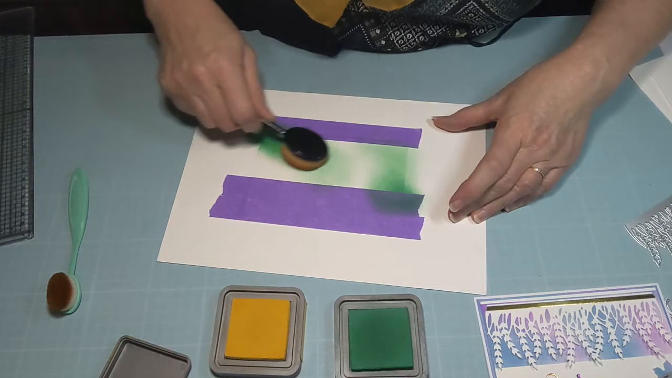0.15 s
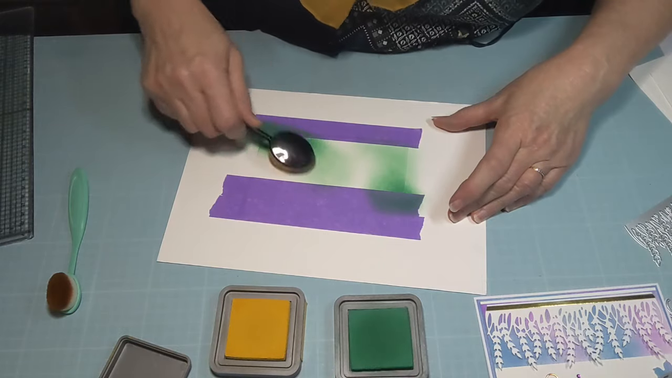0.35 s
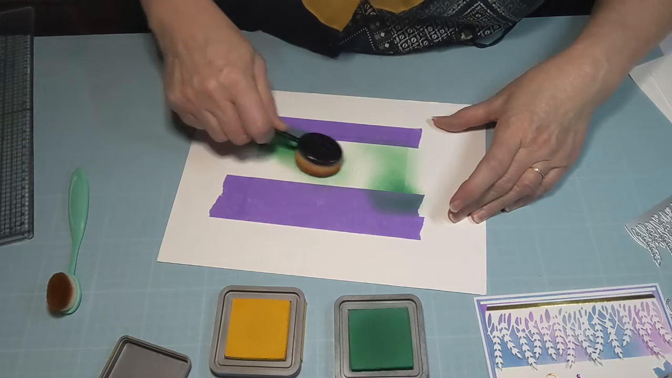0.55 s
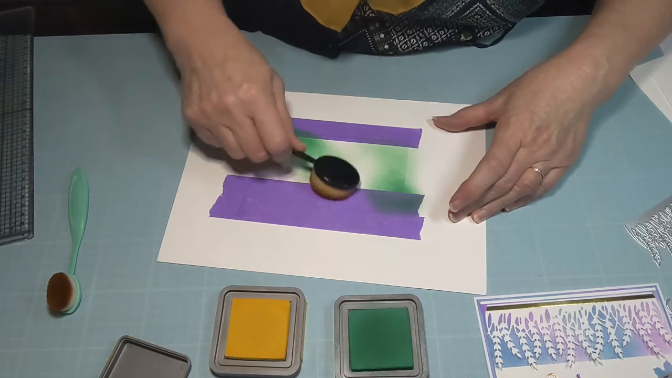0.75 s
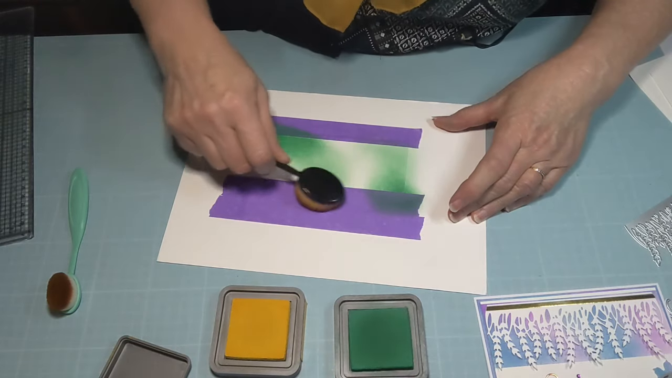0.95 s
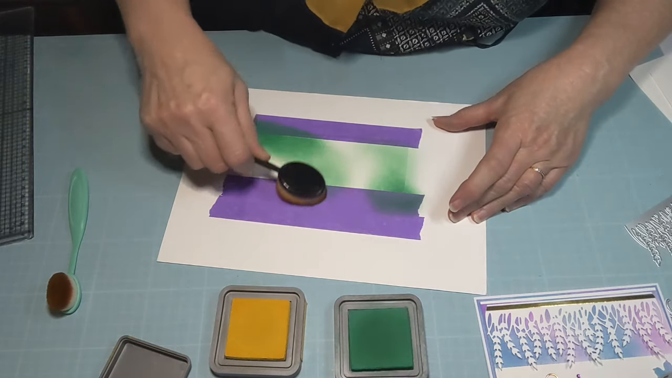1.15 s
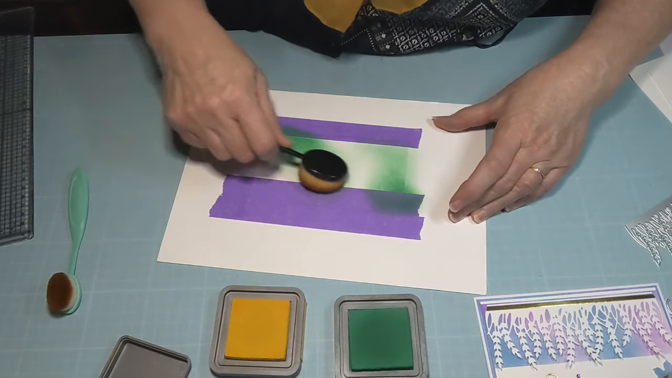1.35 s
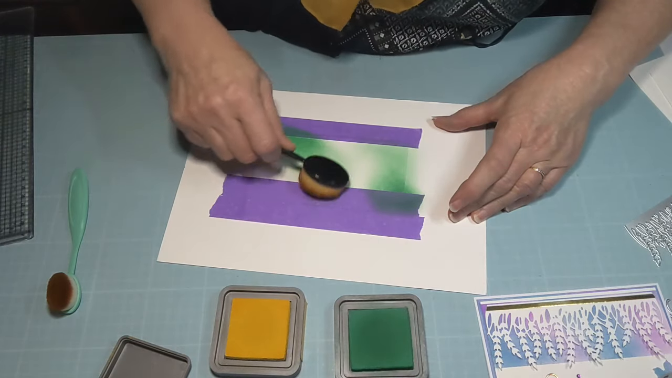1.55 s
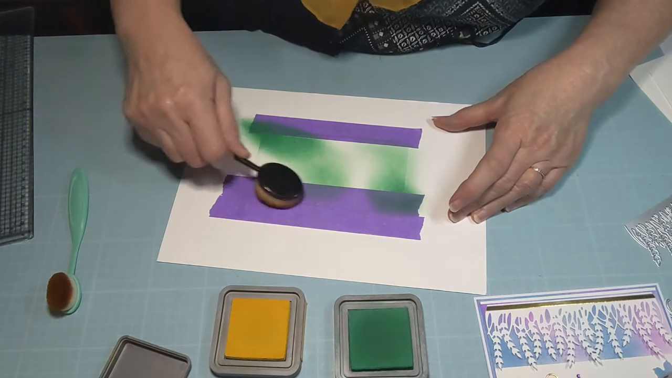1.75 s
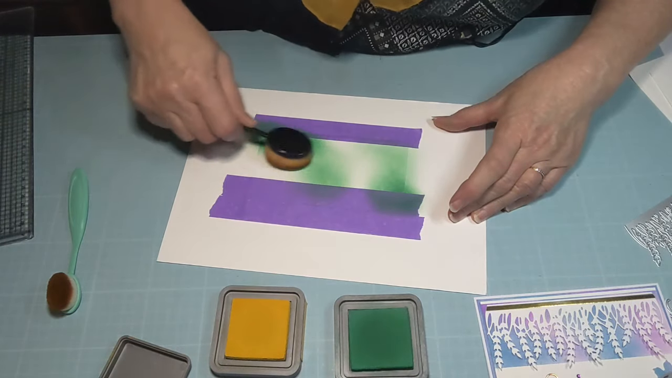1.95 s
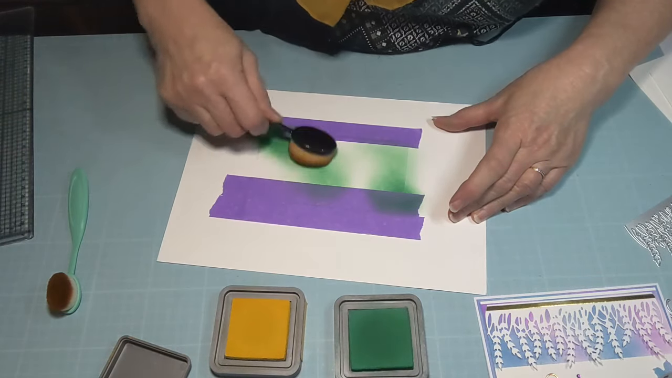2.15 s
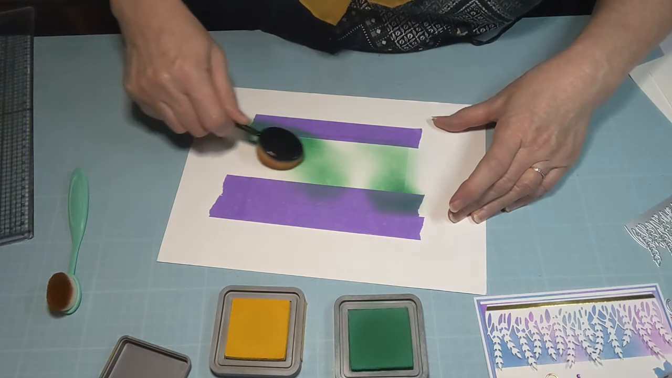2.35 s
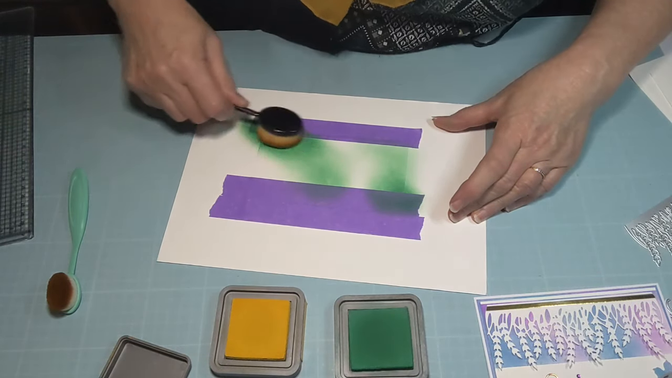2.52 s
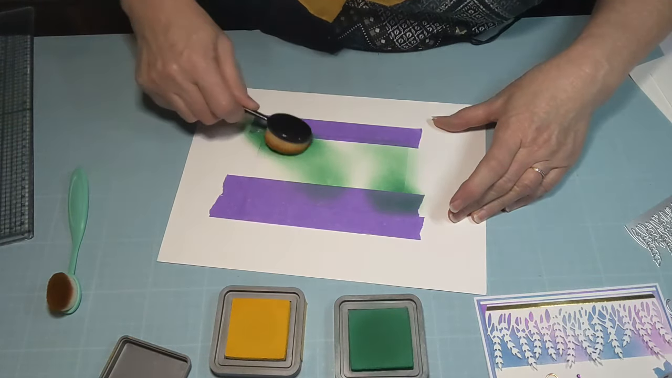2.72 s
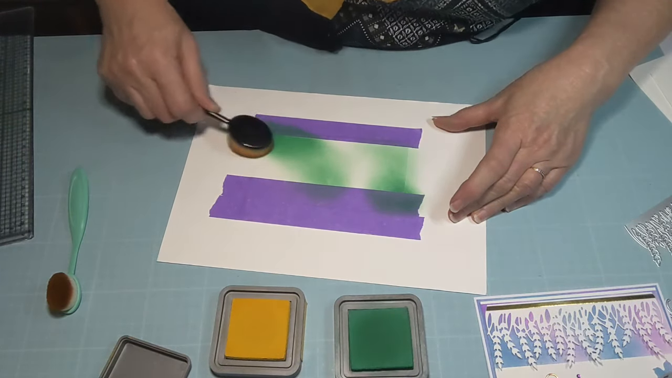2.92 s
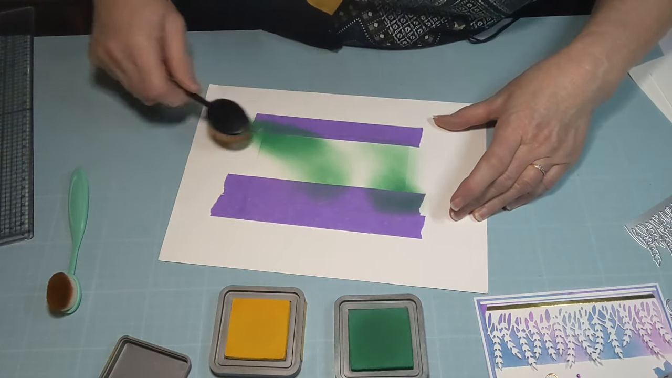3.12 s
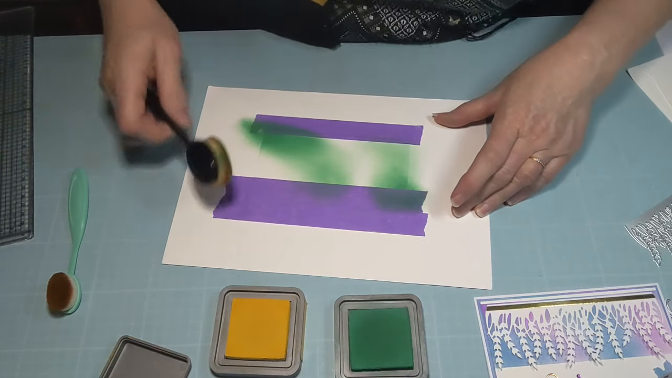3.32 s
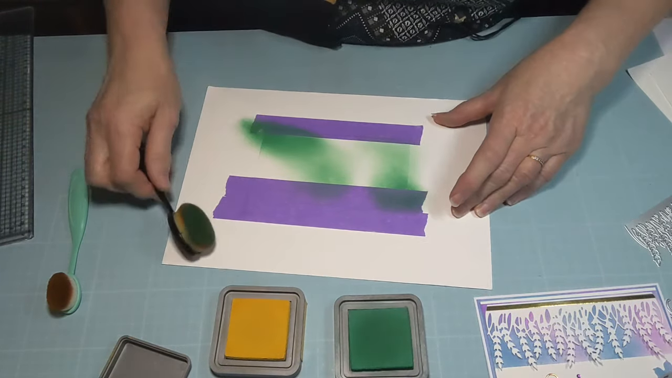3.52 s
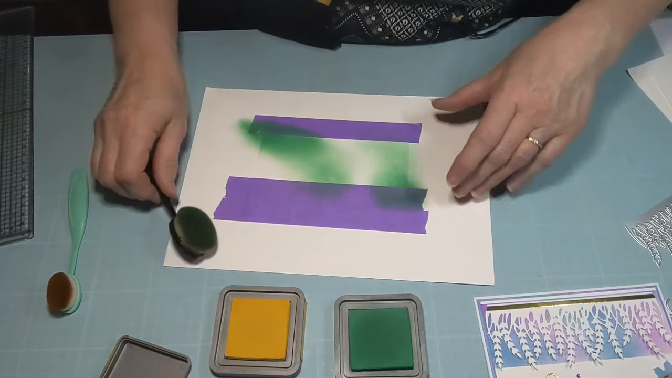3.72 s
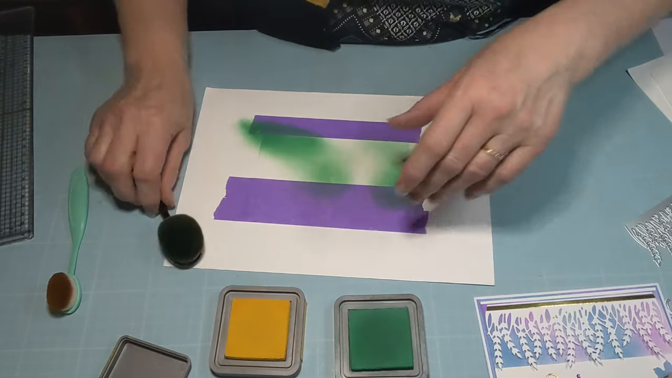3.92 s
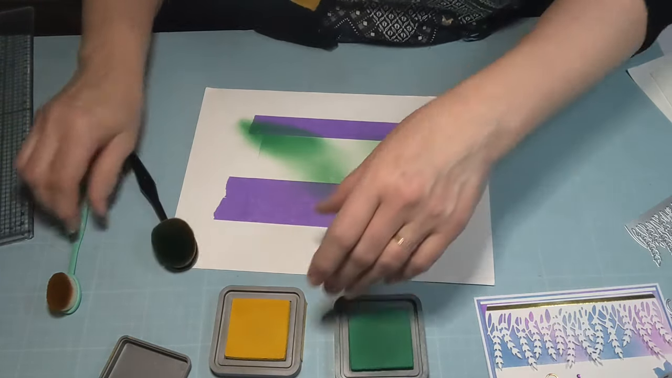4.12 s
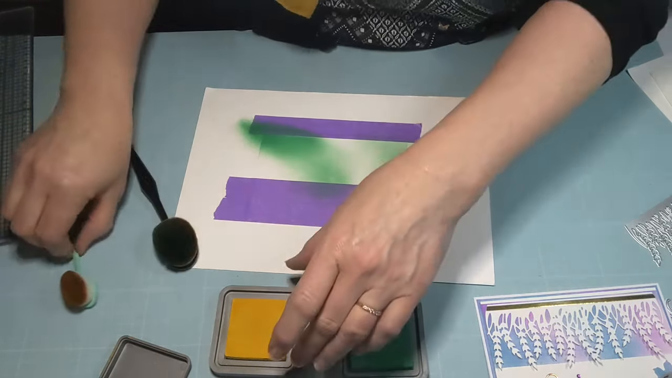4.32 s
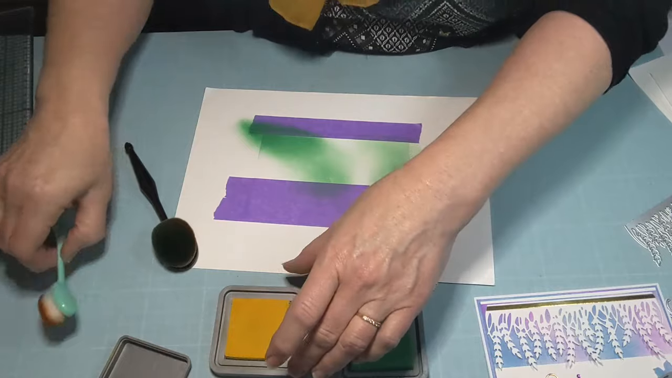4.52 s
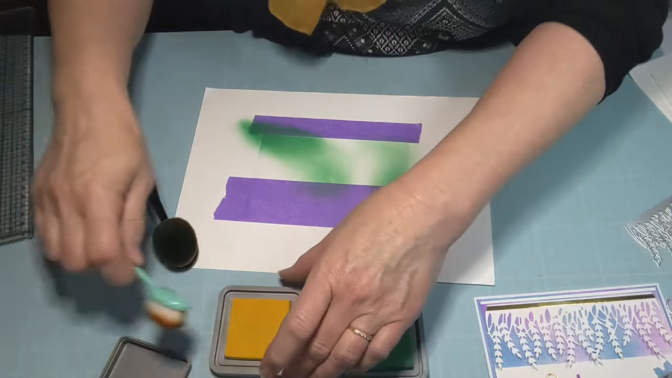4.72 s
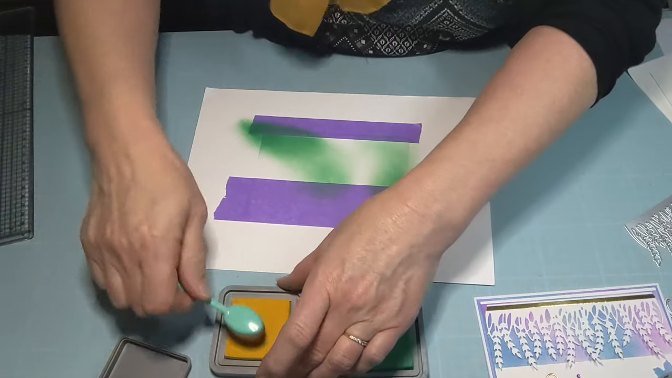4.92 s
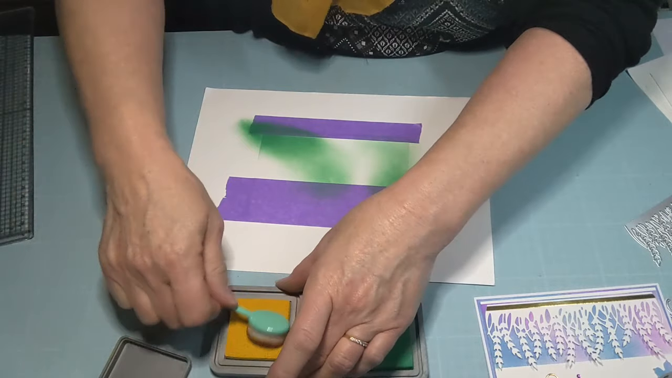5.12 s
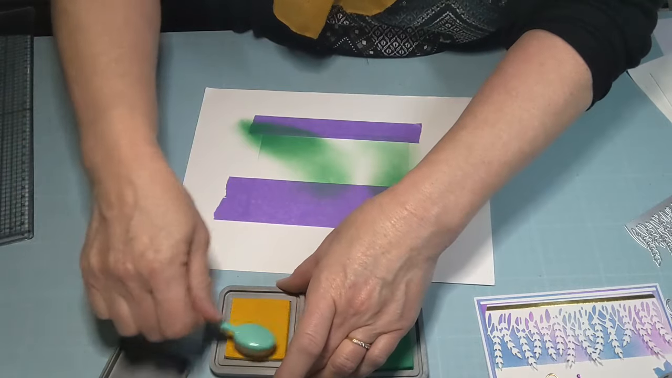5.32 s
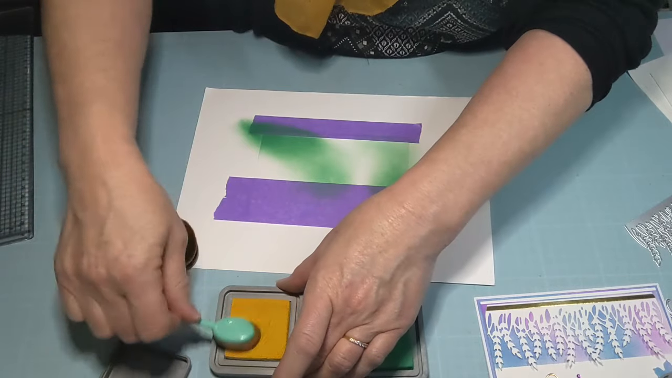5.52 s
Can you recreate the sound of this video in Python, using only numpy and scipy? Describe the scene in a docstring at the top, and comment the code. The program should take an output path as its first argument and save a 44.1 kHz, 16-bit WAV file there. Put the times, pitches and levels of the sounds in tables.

```python
"""A soft blending brush rubs ink into paper in small circles: stick-slip friction of its bristles.
Laid down with a knock and a rattle, it excites the modes of the table top and of its plastic handle.
Hands slide, sleeves rustle, and a second brush is dragged off the mat and swirled on an ink pad.
A small room hums quietly and returns the impacts as early reflections and a short diffuse tail."""
import sys
import numpy as np
from scipy import signal
from scipy.fft import rfft, irfft, next_fast_len
from scipy.io import wavfile
from scipy.ndimage import uniform_filter1d, map_coordinates

SR = 44100
rng = np.random.default_rng(int(sys.argv[2]) if len(sys.argv) > 2 else 0)


def put_to_file(sound):
    """Save the sound as 16-bit audio at rate SR, in the file named by the first command-line argument."""
    columns = np.atleast_2d(sound).T  # one column per channel
    safe = np.clip(columns, -1, 1)
    whole_steps = np.round(safe * 32767)
    wavfile.write(sys.argv[1], SR, whole_steps.astype(np.int16))


N = 245676


def amp(db):
    """Amplitude ratio of a level in decibels."""
    return 10 ** (np.asarray(db) / 20)

def unit(x):
    """Normalisation to rms 1."""
    return x / np.sqrt(np.mean(x ** 2) + 1e-20)

def along(points, hz):
    """Interpolation of (frequency, value) points on a logarithmic frequency axis."""
    f, values = np.transpose(points)
    return np.interp(np.log(hz + 1), np.log(f + 1), values)

def wobble(rate):
    """Slow random modulation: a spline through `rate` Gaussian values a second."""
    knots = rng.standard_normal(int(N * rate / SR) + 4)
    return map_coordinates(knots, [np.arange(N) * rate / SR])

def filtered(x, response):
    """Linear filtering: the spectrum times a frequency response."""
    n = x.shape[-1]
    size = next_fast_len(n + SR // 4)
    return irfft(rfft(x, size) * response(np.fft.rfftfreq(size, 1 / SR)), size)[..., :n]

def spread(pair, spectrum, correlation):
    """Partial coherence: two independent signals, as mid and side, form coloured stereo of rms 1."""
    def response(hz):
        angle = np.arccos(np.clip(along(correlation, hz), -1, 1)) / 2
        return amp(along(spectrum, hz)) * [np.cos(angle), np.sin(angle)]
    mid, side = filtered(pair, response)
    return unit(np.array([mid + side, mid - side]))

def add(track, s, sound):
    """Superposition of a sound on the track from time s."""
    part = track[..., round(s * SR):][..., :sound.shape[-1]]
    part += sound[..., :part.shape[-1]]

def patchy(pair, depth_db):
    """Spectral modulation by a wandering contact: brief gain patches some hundred Hz wide."""
    spectra = signal.stft(pair, nperseg=512)[2]
    field = uniform_filter1d(rng.standard_normal(spectra.shape[1:]), size=3, axis=0)
    field = uniform_filter1d(field, size=12, axis=1)
    return signal.istft(spectra * amp(depth_db * unit(field)), nperseg=512)[1][:, :N]

def swishes(rows, edge_db=9.5, flatness=2.17):
    """Symmetric envelopes of sliding strokes: each gathers speed, peaks and slows."""
    t = np.arange(N) / SR
    return sum(amp(db - edge_db * np.abs(2 * (t - s) / length) ** flatness) for s, length, db in rows)

# Coherence of friction noise: f/Hz, left-right correlation
RUB_COHERENCE = [(300, 1), (900, 0.086), (2500, 0.28), (4000, -0.18), (8000, -0.022), (11000, -0.29),
                 (15000, 0.071)]
def friction(spectrum, slips_per_s, unevenness, flutter_db):
    """Stick-slip friction: tiny impulses of log-normal size, coloured by the surface; the grip wavers."""
    slips = rng.random(N) < slips_per_s / SR
    sizes = np.exp(unevenness * rng.standard_normal(N)) * amp(flutter_db * wobble(60))
    impulses = slips * sizes * rng.standard_normal((2, N))
    return spread(patchy(impulses, depth_db=2), spectrum, RUB_COHERENCE)

# Brush circles: start t/s, turn t/s, outward level/dB, return level/dB, paper level/dB re bristles
BRUSH_CIRCLES = [(0, 0.152, -59, -60, -7.5), (0.302, 0.388, -59.5, -58, -6.5),
                 (0.571, 0.718, -58.5, -58, -6), (.842, .995, -60, -60.5, -3.5),
                 (1.11, 1.196, -58.5, -58.5, -6), (1.285, 1.41, -60, -61.5, -5.5),
                 (1.555, 1.646, -62.5, -58, -8.5), (1.829, 1.97, -60, -57, -10.5),
                 (2.129, 2.26, -58.5, -58.5, -8.5), (2.403, 2.533, -61.5, -58.5, -7),
                 (2.7, 2.83, -63, -58.5, -10.5), (2.983, 3.168, -62, -67, -12)]
def circling(glide_s=0.028, brake_s=0.02, pick_up_s=0.034, lift_s=3.32, lift_db_per_s=53):
    """Amplitude modulation by circular motion: gains for the brush's speed and the paper's share."""
    t = np.arange(N) / SR
    start, turn, out_db, back_db, paper_db = np.transpose(BRUSH_CIRCLES)
    now = np.maximum(np.searchsorted(start, t, side="right") - 1, 0)
    glide = lambda db: uniform_filter1d(db, round(glide_s * SR))
    lulls = lambda times: sum(np.exp(-((t - s) / np.where(t < s, brake_s, pick_up_s)) ** 2) for s in times)
    speed_db = glide(np.where(t < turn[now], out_db[now], back_db[now]))
    speed_db -= 6 * lulls(start) + 2.5 * lulls(turn)  # the brush slows most between circles
    speed_db -= lift_db_per_s * np.maximum(t - lift_s, 0)  # it leaves the paper
    return amp(speed_db), amp(glide(paper_db[now]))

# Friction spectra of bristles, their tips and the paper: f/Hz, relative level/dB
BRISTLE_SPECTRUM = [(1500, -16.5), (4000, -7.5), (5000, -6.5), (5800, -2), (7000, -2), (8400, -1),
                    (9400, -7), (10200, -5), (11000, -12.5), (13000, -9.5), (15800, -30)]
TIP_SPECTRUM = [(5000, -29), (8000, -1), (10000, 6.5), (13000, -8), (15800, -5)]
PAPER_SPECTRUM = [(150, -38), (330, 8.5), (600, -4.5), (1100, 2), (1600, -1.5), (2300, 4), (3200, 3),
                  (4200, -4.5), (6000, -17), (12000, -16)]
def blending(full_speed_db=-57):
    """Friction noise grows with sliding speed: linearly for bristles and paper, squared for the tips."""
    speed, paper_share = circling()
    flick = swishes([(3.28, 0.035, -58.5)])  # the bristles flick off the paper
    speed = np.maximum(speed, flick)
    hiss = friction(BRISTLE_SPECTRUM, slips_per_s=26000, unevenness=0.16, flutter_db=0.42)
    tips = friction(TIP_SPECTRUM, slips_per_s=20000, unevenness=0.18, flutter_db=0.5)
    rasp = friction(PAPER_SPECTRUM, slips_per_s=12000, unevenness=0.23, flutter_db=1.24)
    rubbing = speed * (amp(2) * hiss + amp(2.2) * paper_share * rasp)
    rubbing += amp(-59) * (speed / amp(full_speed_db)) ** 2 * tips
    return rubbing * amp([[0.35], [-0.35]])  # slightly to the left

# Hum partials: f/Hz, rms level/dB
HUM_PARTIALS = [(80.7, -69.5), (123.8, -69), (339, -76.5)]
# Spectra of room rumble and the noise floor: f/Hz, relative level/dB
RUMBLE_SPECTRUM = [(25, -32), (42, -19), (60, -17), (90, 8), (125, -4), (160, -10.5), (240, -25),
                   (500, -40.5)]
FLOOR_SPECTRUM = [(15, -37), (25, -34), (40, -14), (64, -3), (130, -6.5), (157, -10.5), (299, -16),
                  (342, -16), (557, -20), (710, -22.5), (857, -27.5), (1010, -23.5), (3130, -30),
                  (8970, -31), (12000, -36), (15800, -43)]
# Coherence of the room's field: f/Hz, left-right correlation
ROOM_COHERENCE = [(30, 0.4), (70, 1), (140, 0.85), (300, 0.45), (600, 0.39), (1200, 0.07), (4000, 0.033)]
def background(waver_db=-1.5, drift_rad=0.86):
    """Ambient noise: room rumble, microphone hiss and a hum modulated in amplitude and phase."""
    t = np.arange(N) / SR
    hum = np.zeros(N)
    for hz, db in HUM_PARTIALS:
        peak = np.sqrt(2) * amp(db + waver_db * wobble(11))
        hum += peak * np.sin(2 * np.pi * hz * t + drift_rad * wobble(8.3))
    rumble = amp(-65.5) * spread(rng.standard_normal((2, N)), RUMBLE_SPECTRUM, ROOM_COHERENCE)
    floor = amp(-59) * spread(rng.standard_normal((2, N)), FLOOR_SPECTRUM, ROOM_COHERENCE)
    return hum + rumble + floor

# Modes of the table top: f/Hz, relative level/dB, T60/s
TABLE_MODES = [(85.5, 6.5, .13), (130.7, -2.5, 0.23), (184, -12.5, 0.29), (260, -14.5, 0.04),
               (294.6, 3.5, 0.073), (344, -1.5, 0.039), (432, -1.5, 0.047), (512, -2.5, 0.065),
               (598, -3.5, 0.057), (675, -12, 0.094), (782, -6, 0.066), (1090, -17, 0.048),
               (1167, -3, 0.026), (1593, -5.5, 0.026), (2070, -11, 0.043)]
# Blows on the table: t/s, thump level/dB, knock level/dB, contact cut-off f/Hz
BLOWS = [(2.657, -69, -62, 3000), (3.5934, -32.5, -28, 1770), (3.9054, -39.5, -42, 925),
         (3.941, -52, -41.5, 1500), (4.021, -38.5, -34, 670), (4.081, -37, -58, 150),
         (4.177, -47.5, -68, 121), (4.312, -32, -39, 2500), (4.404, -49, -71, 2500), (4.446, -54, -50, 900),
         (5.0588, -57, -55, 1210), (5.063, -42.5, -54, 159)]
def knocks(split_hz=330, attack_s=0.0018, scatter_db=2.5, travel_s=0.00368):
    """Modal response of a struck plate: low modes thump, high ones knock; soft contact is a low-pass."""
    out, t = np.zeros(N), np.arange(SR // 3) / SR
    hz, mode_db, t60 = np.transpose(TABLE_MODES)
    phase = 2 * np.pi * np.sqrt(hz * 1000) * travel_s  # dispersion: bending waves arrive out of step
    envelopes = amp(-60 * t / t60[:, None]) * (1 - np.exp(-t / attack_s))
    modes = np.sin(2 * np.pi * hz[:, None] * t - phase[:, None]) * envelopes
    for s, thump_db, knock_db, cut_hz in BLOWS:
        blow_db = np.where(hz < split_hz, thump_db, knock_db)
        strength = amp(mode_db + blow_db + scatter_db * rng.standard_normal(len(hz)))
        contact = signal.butter(3, [58, cut_hz], "bandpass", fs=SR, output="sos")
        add(out, s, signal.sosfilt(contact, strength @ modes))
    return out

# Resonances of a plastic handle: f/Hz, width/Hz, relative level/dB
HANDLE_MODES = [(2355, 250, 19), (2820, 93, 20.5), (3740, 86, 12), (5060, 34, 27), (5730, 350, 12.5),
                (7100, 1500, 9.5), (8460, 1000, 6.5)]
# Hard plastic contacts: t/s, level/dB, centre f/Hz, spread/octaves
CONTACTS = [(2.658, -49.5, 1190, 0.17), (3.231, -52, 2100, 0.7), (3.591, -34, 11000, 1.4),
            (3.5945, -32.5, 13000, .6), (3.5965, -32.5, 7500, 2.4), (3.9079, -42, 4370, 0.71),
            (3.9416, -42, 1940, 0.31), (3.959, -38.5, 6700, 0.13), (3.996, -41.5, 1380, 0.14),
            (4.029, -47.5, 6960, 1.1), (4.312, -32, 6450, 1.5), (4.3131, -33.5, 4050, 0.17),
            (4.347, -46, 4500, 1.1), (4.403, -41.5, 7140, 0.31), (5.198, -45, 4500, 1.8)]
def clicks(crack_t60=0.007, ring_t60=0.1, ring_db=-12, dull_hz=13500):
    """Impact excitation of a handle: noise shaped by its resonances decays as a crack and a short ring."""
    out, t = np.zeros((2, N)), np.arange(SR // 6) / SR
    decay = amp(-60 * t / crack_t60) + amp(ring_db - 60 * t / ring_t60)
    def handle(hz):
        peaks_db = sum(db / (1 + (2 * (hz - f) / width) ** 2) for f, width, db in HANDLE_MODES)
        return amp(peaks_db) / (1 + (hz / dull_hz) ** 10)
    for s, db, centre_hz, octaves in CONTACTS:
        band = lambda hz: handle(hz) * np.exp(-0.5 * (np.log2((hz + 1) / centre_hz) / octaves) ** 2)
        noise = unit(filtered(rng.standard_normal((2, len(t))), band))
        add(out, s, amp(db) * decay * noise)
    return out

# Paths via nearby surfaces: delay t/s, extra delay on the right t/s, level/dB
REFLECTIONS = [(.0041, .0002, -4), (.0086, -.0002, -1.5), (0.035, -.0003, -15)]
def walls(x):
    """Specular reflection: delayed copies reach the two microphones at slightly different times."""
    def paths(hz):
        return sum(amp(db) * np.exp(-2j * np.pi * hz * np.array([[s], [s + lag]]))
                   for s, lag, db in REFLECTIONS)
    return filtered(x, paths)

# Reverberation time: f/Hz, T60/s
ROOM_T60 = [(100, 0.16), (450, 0.18), (2000, 0.15), (8000, 0.16), (15000, 0.24)]
def room(x, delay_s=0.0069):
    """Diffuse reverberation: an exponential tail, coherent in the bass and incoherent in the treble."""
    noise = spread(rng.standard_normal((2, SR // 3)), [(1000, 0)], ROOM_COHERENCE)  # flat spectrum
    hz, t, spectra = signal.stft(noise, SR, nperseg=256)
    decay = amp(-60 * t / along(ROOM_T60, hz)[:, None])
    tail = signal.istft(spectra * decay, SR, nperseg=256)[1]
    tail = np.pad(tail / np.linalg.norm(tail[0]), ((0, 0), (round(delay_s * SR), 0)))
    return signal.fftconvolve(np.atleast_2d(x), tail, axes=1)[:, :N]

# Hand strokes: middle t/s, duration/s, relative level/dB
HAND_STROKES = [(3.72, 0.067, -59.5), (3.84, 0.1, -63), (4.1, 0.31, -74.5), (4.64, 0.19, -68.5),
                (4.92, 0.12, -69.5)]
# Skin on paper: f/Hz, relative level/dB
SKIN_SPECTRUM = [(500, 5.5), (1500, -9), (2700, -1.5), (4500, -5.5), (6000, -2), (7800, 0), (10000, -1),
                 (13000, -9), (15800, -12)]
def hands():
    """Sliding friction of skin on paper, with a strongly fluctuating grip."""
    rub = friction(SKIN_SPECTRUM, slips_per_s=17000, unevenness=0.22, flutter_db=3.1)
    return amp(5.5) * swishes(HAND_STROKES) * rub

# Drags of the handle: middle t/s, duration/s, relative level/dB
DRAG_STROKES = [(3.948, .075, -51), (4.02, 0.066, -60), (4.34, 0.052, -46.5), (4.4, 0.057, -44.5),
                (4.46, 0.068, -58.5)]
# Plastic on the mat: f/Hz, relative level/dB
MAT_SPECTRUM = [(80, -24), (280, 0), (450, -7), (700, -3.5), (880, -7.5), (1150, -1.5), (1550, -14),
                (2200, -11), (3200, -21.5), (5000, -17.5), (8000, -21.5), (11000, -28), (15800, -37)]
def mat_scrape():
    """Stick-slip of a handle dragged over the mat: a low, rough scrape."""
    scrape = friction(MAT_SPECTRUM, slips_per_s=8400, unevenness=0.18, flutter_db=2.5)
    return amp(2.2) * swishes(DRAG_STROKES) * scrape

# Arm movements: middle t/s, duration/s, relative level/dB
REACHES = [(4.22, 0.4, -63.5), (4.62, .36, -69.5)]
# Rubbing cloth: f/Hz, relative level/dB
CLOTH_SPECTRUM = [(400, -8), (900, -4), (1200, -1), (1600, -6), (2400, -20), (8000, -29)]
def sleeves():
    """Friction of cloth: a mid-band rustle as the arms reach."""
    return swishes(REACHES) * friction(CLOTH_SPECTRUM, slips_per_s=9000, unevenness=0.2, flutter_db=1)

# Swirls on the pad: middle t/s, duration/s, relative level/dB
SWIRLS = [(5.21, 0.1, -59.5), (5.325, 0.1, -59.5), (5.45, .11, -61.5), (5.56, 0.11, -61)]
# Bristles on sponge: f/Hz, relative level/dB
SPONGE_SPECTRUM = [(200, -36), (450, 9), (680, 8), (900, 2.5), (1500, -1), (2500, 0), (4000, 1.5),
                   (6000, 0.5), (9000, 2), (12000, -3), (15800, -15)]
def ink_pad():
    """Broadband friction of bristles swirling in the damp pad."""
    rub = friction(SPONGE_SPECTRUM, slips_per_s=7000, unevenness=0.14, flutter_db=1)
    return amp(3) * swishes(SWIRLS) * rub

def scene():
    """Superposition of all sources; only the table's shorter waves scatter into the diffuse tail."""
    table, plastic = knocks(), clicks()
    short_waves = signal.sosfilt(signal.butter(2, 380, "highpass", fs=SR, output="sos"), table)
    echo = walls(table) + amp(-4) * room(short_waves) + amp(-8.5) * room(plastic)
    rubbing = blending() + hands() + sleeves() + mat_scrape() + ink_pad()
    return rubbing + table + plastic + echo + background()

def record(dry, top_hz=15800):
    """Band limiting by an ideal low-pass filter."""
    return filtered(dry, lambda hz: hz < top_hz)


dry = scene()
out = record(dry)
put_to_file(out)
```